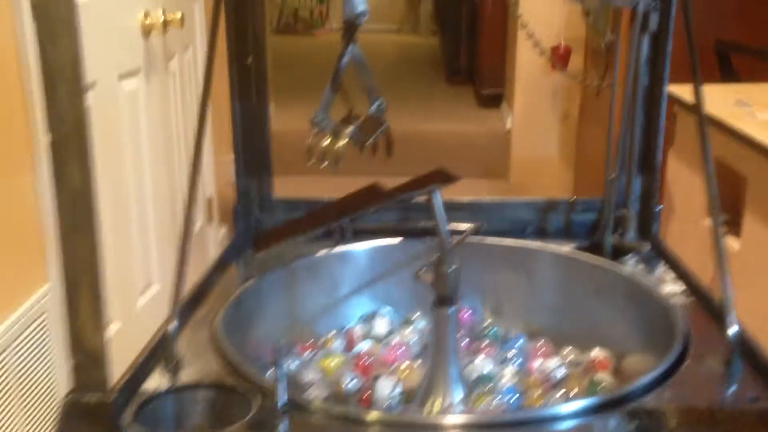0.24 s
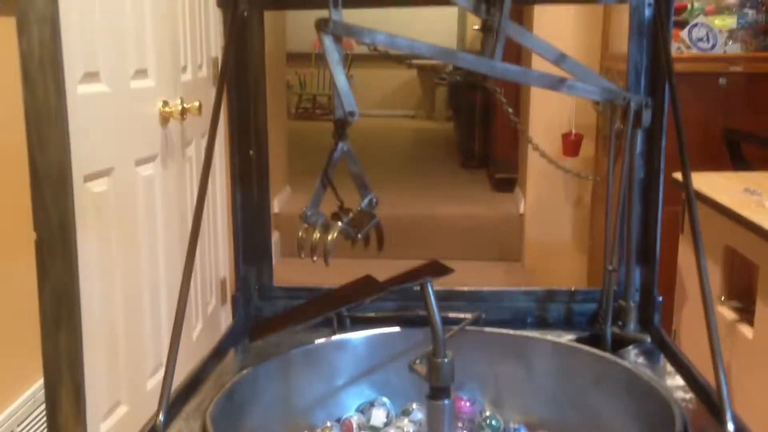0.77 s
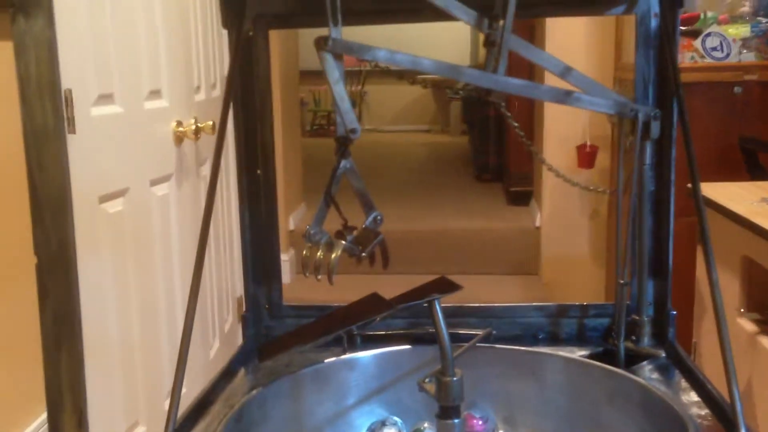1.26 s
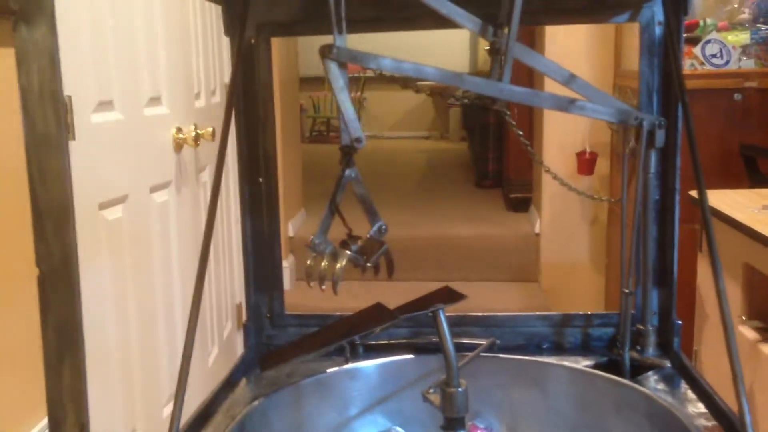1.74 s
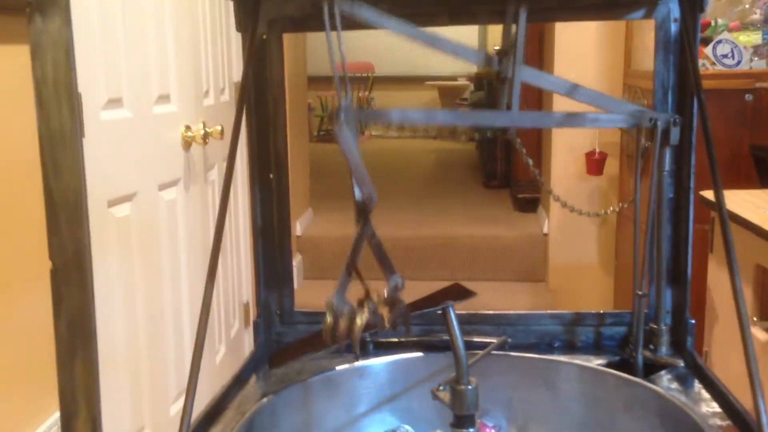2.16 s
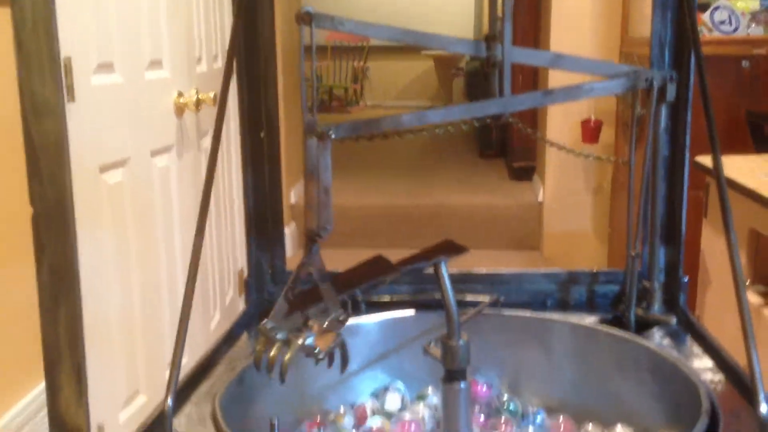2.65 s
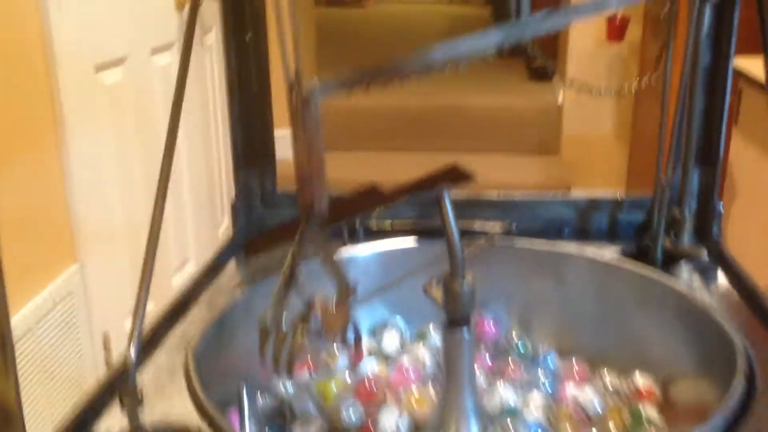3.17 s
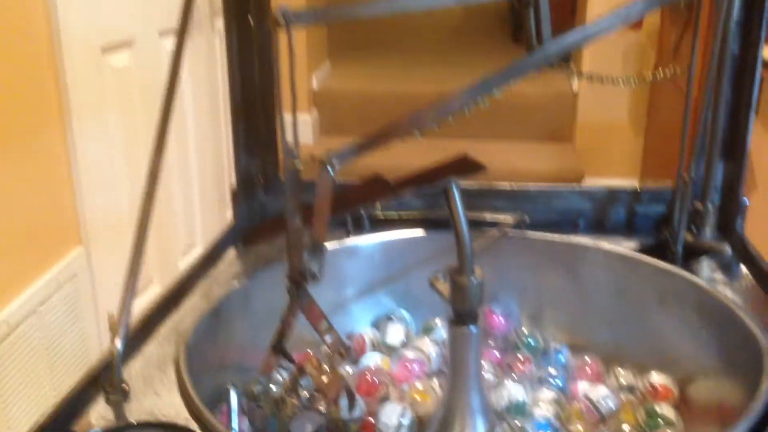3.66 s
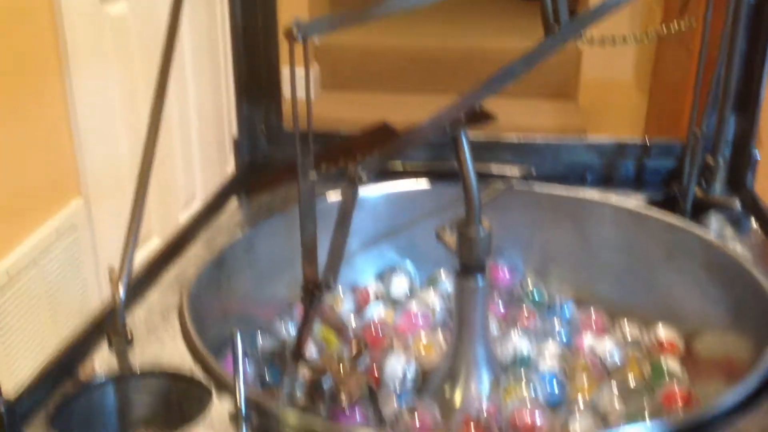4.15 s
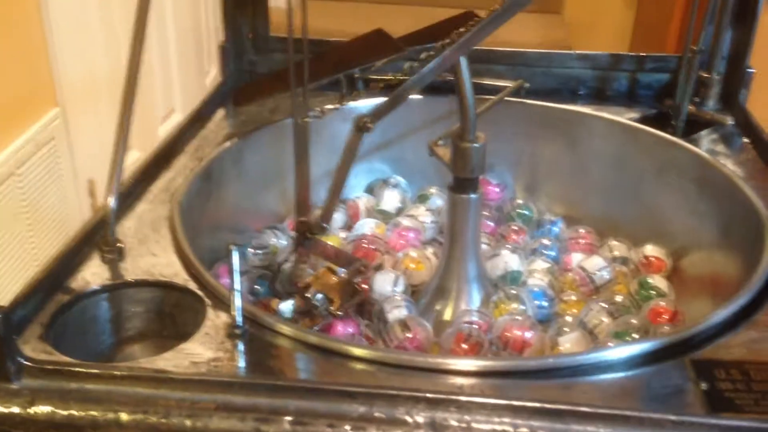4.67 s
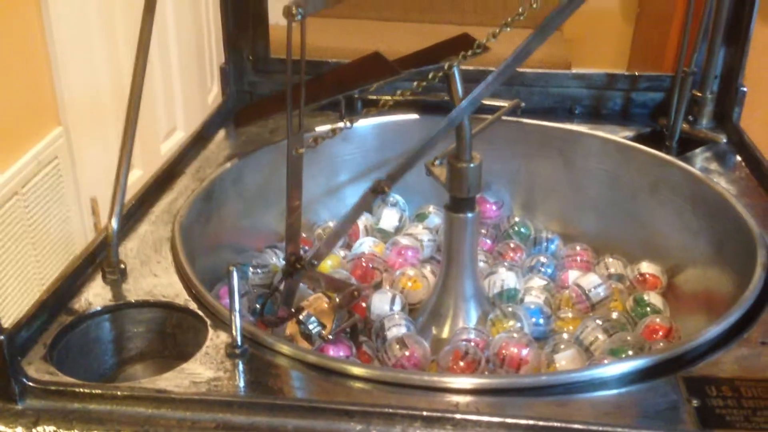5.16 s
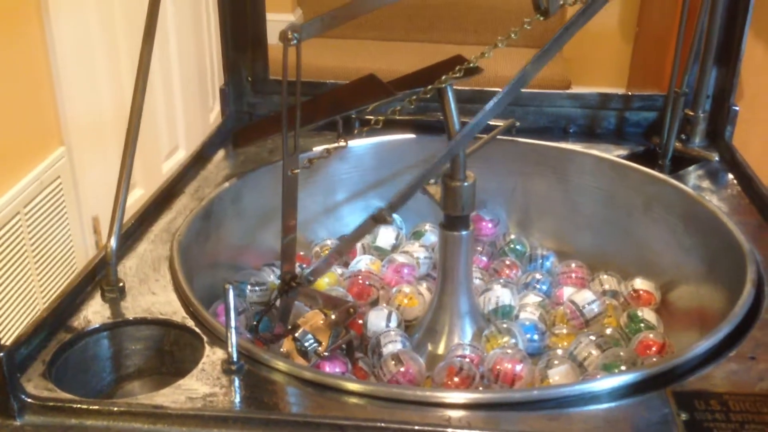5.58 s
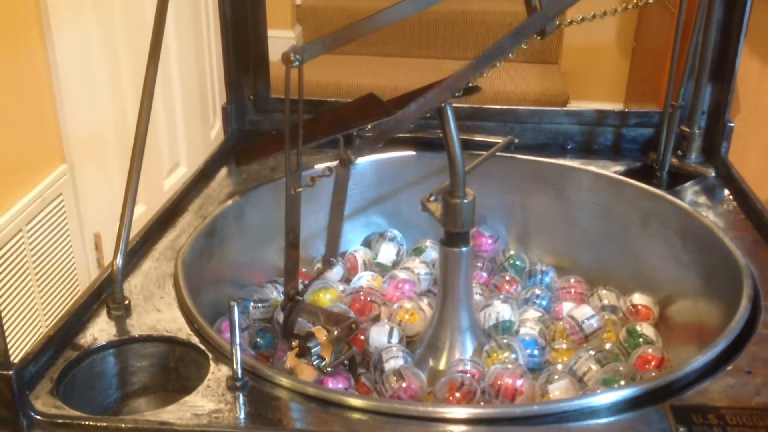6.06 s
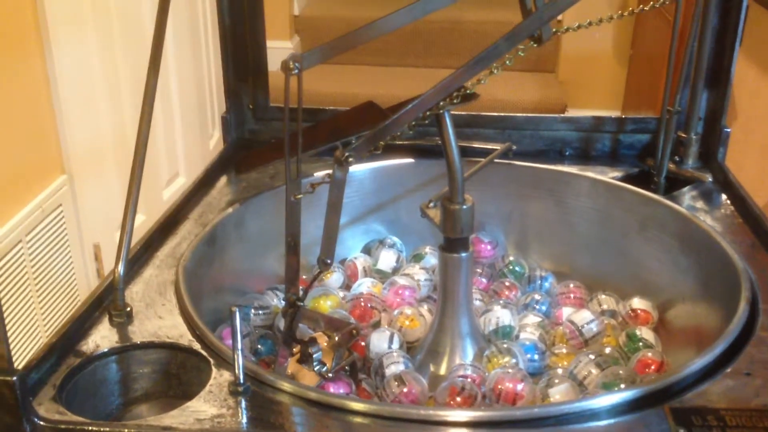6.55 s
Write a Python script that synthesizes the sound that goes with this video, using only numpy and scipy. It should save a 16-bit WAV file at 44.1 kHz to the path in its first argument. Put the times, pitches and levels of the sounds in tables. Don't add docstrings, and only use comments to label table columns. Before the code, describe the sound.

Close, bright ratcheting of a metal crane speeds up, a rattling clank follows, then slower uneven clicks and small glassy knocks over faint room hum.

```python
import sys
import numpy as np
from scipy import signal
from scipy.fft import rfft, irfft
from scipy.io import wavfile
from scipy.ndimage import uniform_filter1d

SR = 44100
rng = np.random.default_rng(int(sys.argv[2]) if len(sys.argv) > 2 else 0)


def persist_wave(psi):
    counts = np.round(np.clip(psi, -1, 1) * 32767).astype(np.int16)
    wavfile.write(sys.argv[1], SR, np.atleast_2d(counts).T)


def natural_amplitude(level_db):
    exponent = np.asarray(level_db, float) / 20
    return 10 ** exponent


N = 300762
RING_N = 16384
T = np.arange(RING_N) / SR

# t/s, ring level/dB
HANGING = [(0.0116, -22), (0.0787, -23), (.1447, -22), (0.2097, -20), (0.2697, -20.5), (0.3389, -21.5),
           (.4146, -22.5), (0.4872, -22.5), (0.5565, -20.5), (.626, -22), (.693, -21.5), (0.7712, -20.5),
           (0.8364, -20.5), (0.8927, -23), (1.073, -24.5)]
# t/s, ring level/dB
SWINGING = [(1.2111, -17.5), (1.2776, -18), (1.3478, -18.5), (1.4047, -16.5), (1.4543, -18), (1.501, -21),
            (1.5499, -22), (1.6046, -22), (1.6534, -22), (1.701, -20.5), (1.751, -22), (1.8239, -21.5),
            (1.8764, -22.5), (1.9275, -20.5), (1.975, -22), (2.0218, -21.5), (2.0686, -22), (2.112, -23),
            (2.1506, -24), (2.191, -25), (2.2396, -22.5)]
# t/s, ring level/dB
SLACK = [
    (2.5004, -25),
    (2.5519, -24),
]
# t/s, ring level/dB
SINKING = [(2.7904, -25), (2.9679, -23.5), (3.2124, -25), (3.309, -22.5), (3.385, -22.5), (3.4691, -22),
           (3.5804, -21.5), (3.8948, -20.5), (3.9823, -20.5), (4.0676, -19.5), (4.1725, -19), (4.3702, -20),
           (4.4657, -19.5), (4.578, -20.5)]
# t/s, ring level/dB
DIGGING = [(4.8722, -20), (4.9576, -20.5), (5.0342, -21.5), (5.1658, -20.5), (5.2828, -20.5), (5.38, -18.5),
           (5.451, -21.5), (5.5328, -22.5), (5.6313, -25), (5.716, -20), (5.786, -24), (5.8552, -22),
           (5.9406, -19.5), (6.0647, -21.5), (6.1453, -24), (6.2915, -25.5), (6.4765, -23.5), (6.6578, -22),
           (6.7647, -25.5)]
DROPS = HANGING + SWINGING + SLACK + SINKING + DIGGING
# t of drop/s, scrape level/dB
CATCHES = [(.01, -5), (.08, -22), (.27, -19), (.34, -17.5), (.49, -21), (.63, -20), (.69, -18), (1.35, -19),
           (1.40, -19), (1.93, -10), (4.17, -15), (4.58, -13.5), (4.87, -20), (4.96, -15), (5.38, -14),
           (5.86, -19)]
# t/s, panel blow level/dB, looking down/0-1, straps facing it/dB
PHONE = [(0, -22, 0, -7), (.7, -21, 0.15, -2), (.95, -20.5, 0, 12), (1.1, -21.5, 1, 4),
         (1.22, -22.5, 0.17, 9.5), (1.7, -20.5, 0.05, -5.5), (2.1, -21.5, 0, 10.5), (2.6, -24.5, 1, 11.5),
         (3.2, -21.5, 1, -9.5), (3.9, -19.5, 0.57, 2.5), (5.0, -19, 0.77, 4.5), (5.55, -19.5, 0.83, -6),
         (6.101, -19, 0.89, 12), (6.82, -19, 1, 5.5)]
# f/Hz, density/dB per Hz
PANEL = [(250, -25), (500, -9), (1050, -9), (1200, -3), (2200, -5), (2900, -1.5), (3400, 0.5), (4200, -2),
         (4700, -5), (5500, -4.5), (6000, -6), (9600, -1.5), (11200, -6), (14400, -3)]
BASE_HZ = [1257, 1372, 1406, 1582, 1647]
BRACKET_HZ = [1780, 1853, 1992, 2095, 2165, 2628, 2703, 2762]
WHEEL_HZ = [3085, 3159, 3196, 3234, 3281, 3350, 3418, 3481, 3551, 3676, 3703, 3980]
STRAPS_HZ = [4904, 5345, 5495, 5545, 5620]
# t60/s, level looking up/dB, level looking down/dB
BASE = [(.2, -24.5, -24), (.2, -36, -24.5), (0.201, -31.5, -20.5), (.2, -39, -21), (.2, -36, -27.5)]
BRACKET = [(.14, -20.5, -29), (.14, -20, -23.5), (.14, -28.5, -18.5), (.14, -22, -17.5),
           (.14, -23.5, -17.5), (.14, -25, -20.5), (.14, -30.5, -15), (.14, -31, -16.5)]
WHEEL = [(.17, -15, -19.5), (.17, -14, -18.5), (.17, -13.5, -10.5), (.17, -12, -20), (.17, -11.5, -13.5),
         (.12, -13, -21), (.12, -15.5, -16), (.12, -15.5, -17), (.12, -16, -14), (.12, -19.5, -16),
         (.12, -20, -16.5), (.12, -25.5, -24.5)]
STRAPS = [(.12, -34, -23), (.12, -28.5, -25.5), (.12, -26, -27.5), (.12, -24.5, -24), (.12, -26.5, -23.5)]


def ratchet(lift_ms=13.0):
    s, db = np.transpose(DROPS)
    when, *phone = np.transpose(PHONE)
    blow_db, down, sheen_db = (np.interp(s, when, column) for column in phone)
    slack = np.isin(s, np.transpose(SLACK)[0])

    high_db = blow_db - db
    low_db = high_db - 1 * slack
    bass_db = low_db - 6.1 * slack - 1 * down
    tilt_db = [bass_db, low_db + 0.1, high_db]
    blows = drifting((len(s), RING_N), 0.68)
    dense = panels(blows, PANEL, tilt_db, stretch=0.95, hall_db=-29.5, hall_t60=0.31, lumps_db=3.58)

    hz = np.array(BASE_HZ + BRACKET_HZ + WHEEL_HZ + STRAPS_HZ)
    t60, up_db, down_db = np.transpose(BASE + BRACKET + WHEEL + STRAPS)
    gain_db = up_db + np.outer(down, down_db - up_db)
    gain_db += 2.45 * drifting(gain_db.shape, 0.55)
    gain_db += 0.39 * np.outer(low_db, hz < 2400)
    gain_db += np.outer(sheen_db, hz > 4500)
    phase = 1.4 * drifting(gain_db.shape, 0.935)
    gains = natural_amplitude(gain_db) * np.exp(1j * phase)

    wooden = hz < 1700
    metal_ring = modes(hz, 0.91 * t60, gains * ~wooden) * rise(2.23)
    wood_ring = modes(hz, 0.87 * t60, gains * wooden) * rise(16.0)
    ring = metal_ring + natural_amplitude(3.0) * wood_ring
    hits = natural_amplitude(db)[:, None] * (natural_amplitude(-2.5) * dense * rise(1.77) + natural_amplitude(1.0) * ring)

    lift_db = np.full(len(s), -28.0)
    for at, catch_db in CATCHES:
        lift_db[np.argmin(np.abs(s - at))] = catch_db
    scrape = natural_amplitude(lift_db)[:, None] * hits * natural_amplitude(-60 * T / 0.16) * rise(4.2)
    return place(s - .0012, hits) + place(s - lift_ms / 1000, scrape)


# t/s, peak level/dB, low/dB, treble/dB, rods/dB
CLAW = [(2.2867, -4.5, -24.5, -8.5, -9), (2.3033, -26, -0.5, -8, -2), (2.326, -18, -10.5, -1, -6),
        (2.3738, -21, -19, -7, -16), (2.3981, -24, -11, -0.5, -19), (2.4151, -19.5, -11, -1.5, -8),
        (2.4333, -27, -12.5, -25, -5), (2.5187, -37.5, -2.5, -1, -2), (2.5949, -25.5, -12, -4, -14),
        (2.6112, -28, -18.5, -7.5, -13), (2.6538, -36, -16, -3, -14)]
# f/Hz, density/dB per Hz
CLAW_PANEL = [(150, -53), (250, -26), (460, -25.5), (950, -7.5), (1180, -10), (1350, -7), (2320, -8.5),
              (3340, 2.5), (6820, -8), (14700, -19.5), (16000, -29.5)]
RODS_HZ = [1160, 1184, 1503, 1860, 2629, 3284, 3370, 3666, 3787, 4059, 4274, 4721, 5110, 5620, 6480]
# level/dB, t60/s
RODS = [(-18.5, 0.42), (-13.5, 0.19), (-7.5, 0.1), (-12, 0.07), (-14.5, 0.28), (-2.5, 0.092), (-4, 0.19),
        (-0.5, 0.089), (-4, 0.12), (-12.5, 0.045), (-12, 0.11), (-11.5, 0.11), (-9.5, .1), (-21, 0.074),
        (-17.5, 0.12)]


def claw():
    rise_ms = 4.0
    s, db, low_db, high_db, rods_db = np.transpose(CLAW)
    low_db = low_db - low_db.mean()
    high_db = high_db - high_db.mean()
    blows = rng.standard_normal((len(s), RING_N))
    dense = panels(blows, CLAW_PANEL, [low_db, low_db, high_db],
                   stretch=1.0, hall_db=-15.5, hall_t60=0.37, lumps_db=3.5)
    dense *= 1 + 1.3 * natural_amplitude(-60 * T / 0.035)

    rods_hz = np.array(RODS_HZ)
    ring_db, t60 = np.transpose(RODS)
    ring_db = ring_db + 0.29 * np.outer(db - db.max() + 14, rods_hz < 2700)
    chance = rng.standard_normal((len(s), 2, len(t60)))
    gains = natural_amplitude(rods_db[:, None] + ring_db + 2 * chance[:, 0]) * np.exp(1j * np.pi * chance[:, 1])
    ring = modes(rods_hz, np.minimum(t60, .27), gains)

    bowl_gains = natural_amplitude(low_db[:, None] + np.array([-21, -27])) + 0j
    bowl = modes(np.array([463., 340.]), np.array([.3, .2]), bowl_gains)
    hits = natural_amplitude(db)[:, None] * (natural_amplitude(1.5) * dense + natural_amplitude(0.5) * ring + bowl) * rise(rise_ms)
    return place(s - rise_ms / 2000, hits)


# t/s, peak level/dB, note f/Hz, note level/dB
MARBLES = [
    (4.2432, -35.5, 9210, -6),
    (4.2674, -52, 5880, -9),
    (4.5236, -32, 4950, -11),
    (4.5353, -26.5, 4960, -7),
    (4.6684, -47, 6030, -8),
    (4.7255, -42, 6360, -14),
    (4.7594, -57.5, 9320, -14),
    (4.7935, -52, 4050, -15),
    (5.3623, -33, 5310, -10),
    (6.1194, -57, 9710, -12),
]
# f/Hz, density/dB per Hz
GLASS = [(500, -19), (2000, 5.5), (4000, 8), (6000, 7.5), (9000, 9), (14000, 12)]


def marbles():
    s, db, hz, note_db = np.transpose(MARBLES)
    knocks = rng.standard_normal((len(s), RING_N))
    crack = panels(knocks, GLASS, np.zeros((3, len(s))),
                   stretch=0.78, hall_db=-27, hall_t60=0.28, lumps_db=5.1)
    note = modes(hz, np.full(len(s), .1), np.diag(natural_amplitude(note_db)) + 0j)
    hits = natural_amplitude(db)[:, None] * (natural_amplitude(-8.0) * crack + natural_amplitude(-2) * note) * rise(0.82)
    return place(s - .001, hits)


# t/s, peak level/dB, rising/dB per s, fading/dB per s
SHOWERS = [
    (0, -62, 50, 5),
    (2.58, -44, 100, 70),
    (4.25, -50, 200, 220),
    (4.55, -50, 130, 75),
    (4.8, -60, 120, 190),
    (3.8, -72, 90, 90),
]
# f/Hz, density/dB per Hz
LINKS = [(400, -0.5), (1300, 3.5), (2400, -0.5), (4000, 2.5), (7000, -8.5), (14000, -15.5)]


def trickle():
    settled_s, still_db, ticks_per_s = 2.76, -76, 600
    ticks = (rng.random(N) < ticks_per_s / SR) * rng.standard_normal(N)
    body = panels(rng.standard_normal((1, RING_N)), LINKS, np.zeros((3, 1)),
                  stretch=0.9, hall_db=-23.5, hall_t60=.25, lumps_db=2.5)[0]
    level_db = peaks(*np.transpose(SHOWERS))
    t = np.arange(N) / SR
    level_db -= 300 * np.clip(t - settled_s, 0, None) * (t < settled_s + .5)
    return unit(signal.fftconvolve(ticks, body)[:N]) * natural_amplitude(np.maximum(level_db, still_db))


# f/Hz, width/Hz, level/dB
RUMBLE_MODES = [(141, 32, -4.5), (169.8, 9.1, -1), (211.6, 34, -6), (366, 170, -17.5)]
# t/s, peak level/dB, fading/dB per s
LURCHES = [(1.19, -55.5, 60), (1.4, -51, 110), (1.72, -50, 148), (2.01, -47.5, 200), (2.13, -42, 85),
           (2.32, -46, 198), (2.41, -44.5, 100), (2.54, -52, 57), (3.25, -56, 112), (3.53, -57, 54),
           (4.08, -37, 700.5), (4.179, -40.5, 224), (4.485, -41, 177), (4.88, -48, 88), (5.46, -48, 115.5),
           (5.87, -55, 48), (6.17, -54.5, 43)]


def rumble():
    rest_db, crank_db_per_rate, crank_memory_s = -70.5, 0.6336, 0.13
    hz = np.arange(N // 2 + 1) * SR / N
    body = sum(natural_amplitude(db) / (1 + (2 * (hz - f) / w) ** 2) for f, w, db in RUMBLE_MODES)
    shake = unit(irfft(rfft(rng.standard_normal(N)) * body, N))

    drops = np.transpose(DROPS)[0]
    clicks = place(drops, np.eye(1, RING_N).repeat(len(drops), axis=0))
    rate = SR * uniform_filter1d(clicks, int(crank_memory_s * SR))
    s, db, fading = np.transpose(LURCHES)
    lurch_db = peaks(s, db, 5.5 * fading, fading)
    return shake * natural_amplitude(np.maximum(rest_db + crank_db_per_rate * rate, lurch_db))


# f/Hz, density/dB per Hz
HOUSE = [(15, -44.5), (25, -20), (66, -8), (92, -13), (120, 0), (166, -3.5), (249, -2.5), (277, -22.5),
         (1040, -28), (1370, -16.5), (1940, -34.5), (2410, -22.5), (3160, -38.5), (14800, -46.5),
         (16000, -58.5)]
# f/Hz, level/dB rms
HUM = [(72, -76), (120, -67.5)]


def house():
    hz = np.arange(N // 2 + 1) * SR / N
    colour = natural_amplitude(on_log(np.minimum(hz, 14500), HOUSE))
    air = unit(irfft(rfft(rng.standard_normal(N)) * colour, N))
    t = np.arange(N) / SR
    hum = sum(np.sqrt(2) * natural_amplitude(db) * np.sin(2 * np.pi * f * t) for f, db in HUM)
    mic_hiss = natural_amplitude(-68.5) * rng.standard_normal(N)
    return natural_amplitude(-59) * air + hum + mic_hiss


# f/Hz, t60/s
PANEL_T60 = [(300, 0.41), (1400, 0.23), (3600, 0.17), (9000, .11), (15000, 0.075)]
BANDS_HZ = 250 * 2 ** np.arange(0, 6.1, .5)


def panels(noise, colour, tilt_db, stretch, hall_db, hall_t60, lumps_db):
    hz = np.arange(RING_N // 2 + 1) * SR / RING_N
    lumps = np.repeat(drifting((len(noise), 129), 0.67), 64, axis=1)
    clusters = uniform_filter1d(lumps, size=64)[:, :len(hz)]
    colour_db = on_log(np.minimum(hz, 14500), colour) - on_log(3290, colour)
    spectrum = rfft(noise) * natural_amplitude(colour_db + lumps_db * clusters * np.clip(hz / 1200, .4, 1))
    out = np.zeros(noise.shape)
    for centre in BANDS_HZ:
        share = np.clip(1 - 2 * np.abs(np.log2(np.maximum(hz, 1) / centre)), 0, 1)
        panel_fade = natural_amplitude(-60 * T / (stretch * on_log(centre, PANEL_T60)))
        hall_fade = natural_amplitude(hall_db - 60 * T / hall_t60)
        knock = 1 + 1.1 * natural_amplitude(-60 * T / .06) * (centre < 900)
        envelope = (panel_fade + hall_fade) * rise(1800 / centre) * knock
        region = int(centre > 900) + int(centre > 3500)
        out += natural_amplitude(tilt_db[region])[:, None] * irfft(spectrum * share) * envelope
    return out


def modes(hz, t60, gains):
    return np.imag(gains @ np.exp(np.outer(2j * np.pi * hz - np.log(1000) / t60, T)))


def rise(ms):
    return 1 - np.exp(-(T / (np.clip(ms, .2, 30) / 1000)) ** 2)


def drifting(shape, keep):
    keep = np.clip(keep, 0, .98)
    rows = rng.standard_normal(shape)
    rows[1:] *= np.sqrt(1 - keep ** 2)
    return signal.lfilter([1], [1, -keep], rows, axis=0)


def place(times, hits):
    out = np.zeros(N + RING_N)
    for s, hit in zip(times, hits):
        i = max(int(s * SR), 0)
        out[i:i + RING_N] += hit
    return out[:N]


def peaks(s, db, rising, fading):
    late = np.arange(N) / SR - s[:, None]
    swells = np.minimum(late * rising[:, None], -late * fading[:, None])
    return np.max(db[:, None] + swells, axis=0)


def unit(x):
    return x / np.sqrt(np.mean(x ** 2, axis=-1, keepdims=True))


def on_log(hz, table):
    f, v = np.transpose(table)
    return np.interp(np.log(np.maximum(hz, 1)), np.log(f), v)


def scene():
    return (ratchet() + claw() + marbles() + trickle() + rumble() + house())[None]


def low_pass(x):
    return signal.sosfilt(signal.butter(12, 16470, fs=SR, output="sos"), x)


def record(dry):
    step = signal.ellip(6, .3, 19, 15120, fs=SR, output="sos")
    top = signal.butter(16, 15950, fs=SR, output="sos")
    mix = signal.sosfilt(np.vstack([step, top]), dry)
    return low_pass(mix)


dry = scene()
out = record(dry)
persist_wave(out)
```